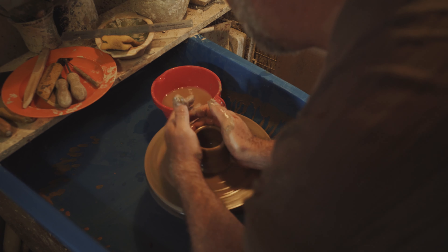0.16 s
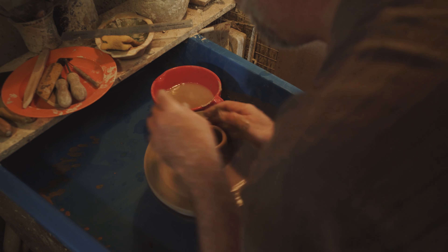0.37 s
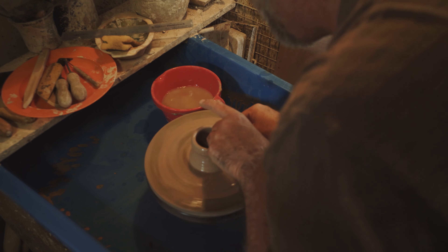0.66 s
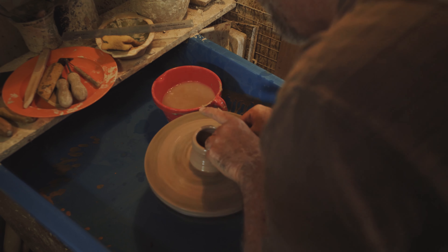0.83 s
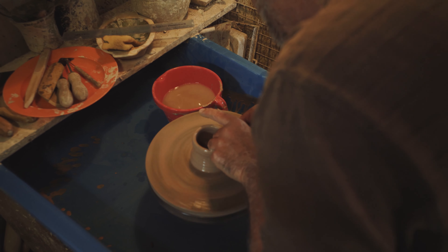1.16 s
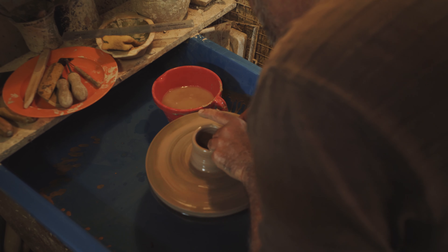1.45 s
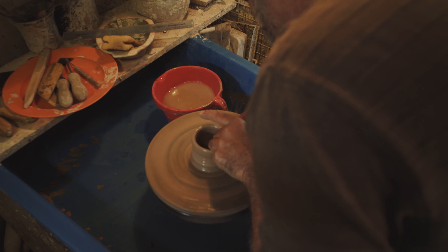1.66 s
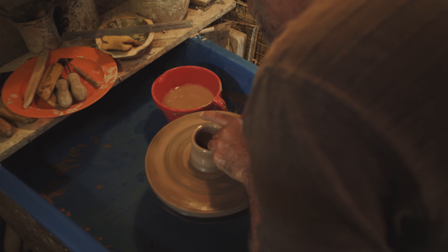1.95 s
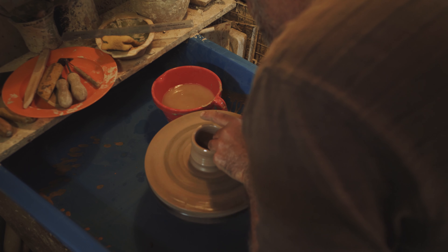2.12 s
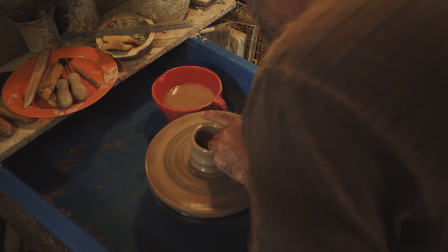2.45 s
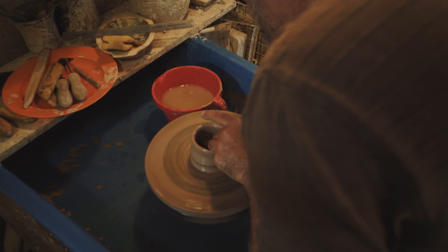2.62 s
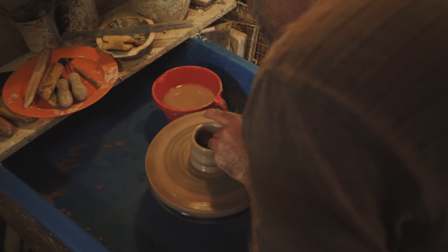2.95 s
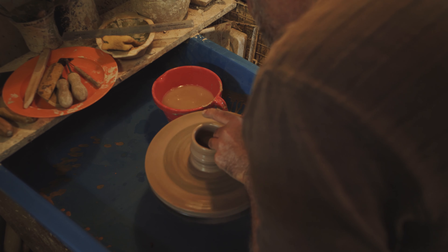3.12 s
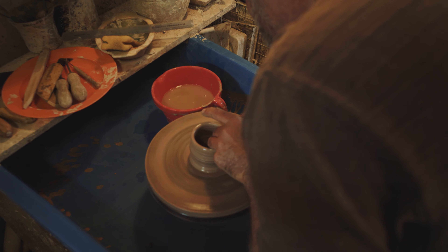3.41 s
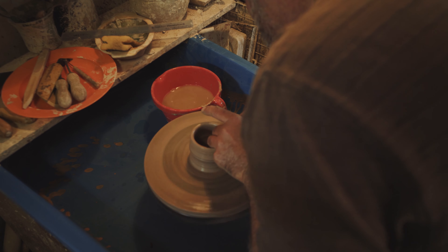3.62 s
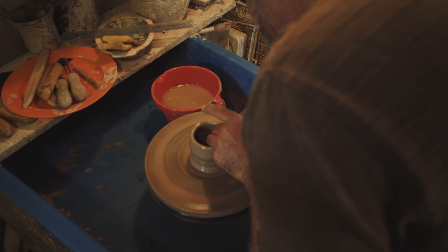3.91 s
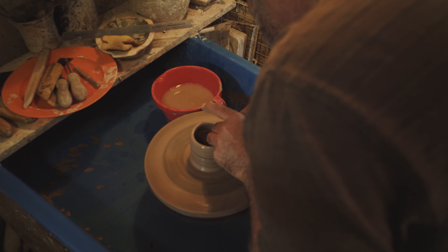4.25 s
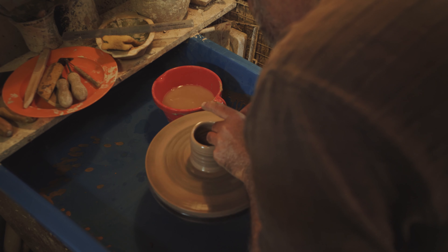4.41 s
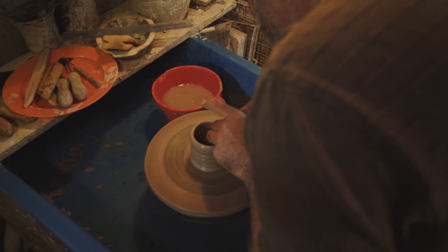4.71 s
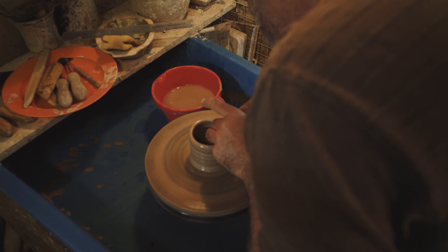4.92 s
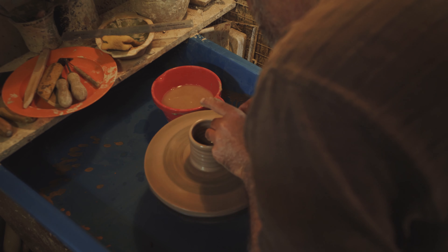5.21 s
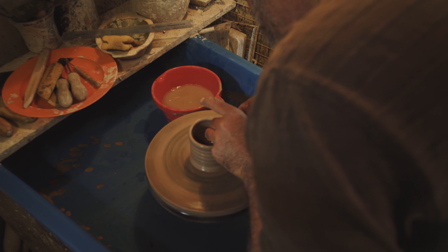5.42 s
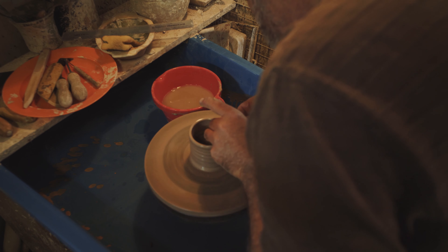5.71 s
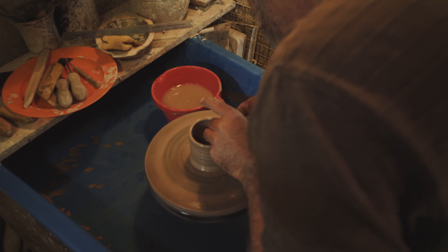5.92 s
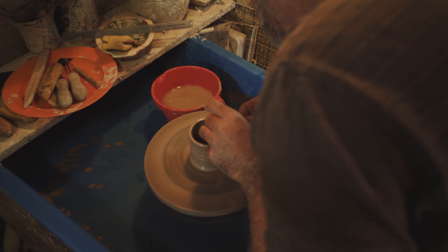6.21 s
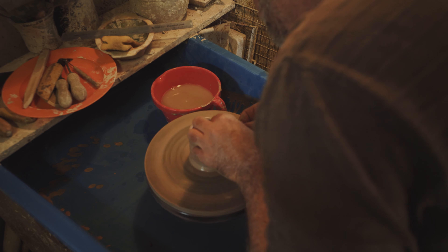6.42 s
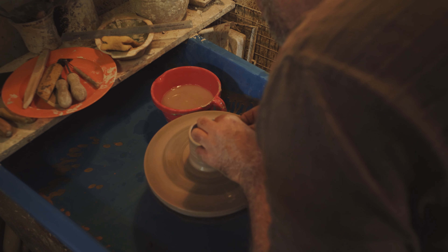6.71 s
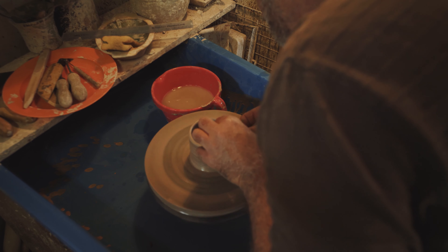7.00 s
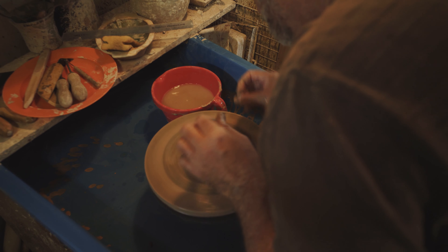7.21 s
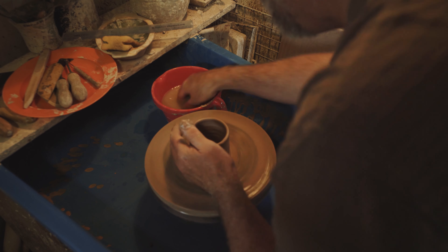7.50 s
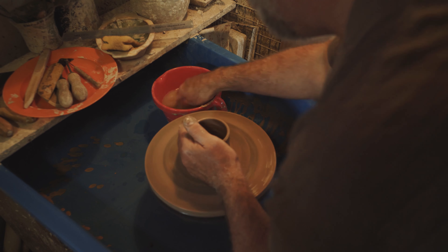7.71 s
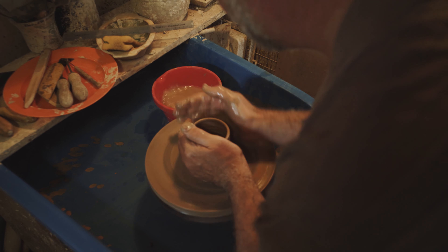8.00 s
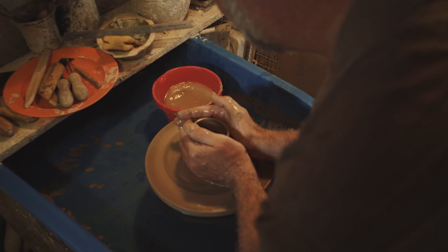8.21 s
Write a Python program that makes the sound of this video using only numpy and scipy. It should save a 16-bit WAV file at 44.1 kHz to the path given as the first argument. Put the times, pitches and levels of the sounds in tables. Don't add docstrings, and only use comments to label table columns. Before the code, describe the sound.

An electric pottery wheel hums and rumbles close by while wet hands brush clay, then a hand dips into a cup with a sharp splash and drips.

```python
import sys
import numpy as np
from scipy import signal
from scipy.fft import rfft, irfft, next_fast_len
from scipy.io import wavfile
from scipy.ndimage import uniform_filter1d, map_coordinates

SR = 44100
rng = np.random.default_rng(int(sys.argv[2]) if len(sys.argv) > 2 else 0)


def attenuation_scalar(level_db):
    decades = np.asarray(level_db, float) / 20
    return 10 ** decades


def to_wav(sig):
    pcm = np.clip(np.atleast_2d(sig), -1, 1) * 32767
    pcm = np.round(pcm).astype(np.int16)
    wavfile.write(sys.argv[1], SR, pcm.T)


N = 368676
RIPPLE_HZ = 99.84

# frequency in Hz, T60 in seconds.
ROOM_DECAY = [(200, 0.37), (2000, 0.13), (10000, 0.16)]
# centre in seconds, half length in seconds, level in dB.
DRONE_SWELLS = [
    (.2, 0.31, -28),
    (1.8, .75, -23.5),
]
# centre in Hz, width in Hz, level in dB.
CASING_RESONANCES = [(31.3, 6.4, -4.5), (66.3, 6, 4.5), (106, 15, -1.5), (157, 6.8, -4), (168.6, 27, -3),
                     (203.14, 4.1, 4), (260.6, 62, -2), (307.4, 12, -4.5), (345.3, 65, -0.5),
                     (416.5, 60, -4), (476.8, 45.6, -6.5), (602, 72, -21), (751.4, 52, -20.5),
                     (877, 46, -24.5), (1580, 120, -25), (1455, 200, -22), (1650, 190, -26.5),
                     (1850, 350, -29), (1900, 19, -27), (2308, 80, -27), (3087, 130, -32.5),
                     (3430, 140, -31), (3700, 200, -41), (4320, 52, -54), (5000, 270, -50),
                     (6000, 1000, -55), (7100, 490, -57)]
# frequency in Hz, level in dB per Hz.
CASING_BED = [(8, -63), (20, -6), (85, -1), (135, -10.5), (222, -21), (320, -6), (500, -6.5), (680, -25.5),
              (1150, -27.5), (2600, -30.5), (3700, -36.5), (4700, -54.5), (7500, -60), (15800, -63.5)]
# time in seconds, pressure as a level in dB.
HAND_PRESSURE = [(0, -55.5), (.74, -54), (1.2, -54.5), (1.5, -49), (1.95, -49.5), (2.3, -52), (2.9, -58),
                 (3.6, -64), (7.2, -63.5), (7.75, -57), (8.06, -60.5), (8.36, -53.5)]
# frequency in Hz, level in dB per Hz.
RUB_COLOUR = [(1500, -120), (2500, 1), (4200, -4), (5500, -13.5), (8000, -19.5), (11000, -24), (15500, -31)]
# frequency in Hz, level in dB per Hz.
SCUFF_COLOUR = [(450, -120), (650, -11.5), (1050, -2), (1500, -15), (1900, -16.5), (3500, -17),
                (4200, -19.5), (6000, -38.5), (9000, -120)]
# centre in seconds, half length in seconds, level in dB.
SLEEVE_STROKES = [
    (1.4, 0.19, -41),
    (1.88, 0.067, -33),
    (1.99, 0.022, -31.5),
    (2.06, 0.05, -36.5),
]
# centre in seconds, half length
# in seconds, rms level in dB, resonance centre in Hz, resonance width in Hz.
SWISHES = [(0.759, .15, -62, 11240, 2460), (1.48, 0.066, -58, 9570, 3980),
           (1.647, .06, -56.5, 7000, 2510), (1.87, 0.057, -43, 4200, 300),
           (2.028, 0.094, -46, 4200, 700), (1.864, 0.054, -54.5, 9000, 9000),
           (2.044, .05, -57, 8970, 9000), (2.249, 0.034, -61.5, 7970, 9000),
           (7.395, .1, -60.5, 7040, 8000), (1.87, 0.063, -33, 1510, 400.5),
           (1.93, .08, -30.5, 1100, 500), (2.044, 0.042, -34, 775, 250),
           (7.679, 0.028, -32, 834, 500), (7.821, 0.033, -33.5, 1500, 1500),
           (7.831, 0.039, -44, 4480, 1800), (7.949, .05, -44, 3500, 2490),
           (8.252, 0.023, -45, 3000, 5000)]
# start in seconds, peak in dB, centre in Hz.
SURFACE_POPS = [
    (7.6594, -8, 2590),
    (7.9012, -34.5, 3500),
]
# start in seconds, peak in dB, centre in Hz.
FILM_CRACKS = [
    (7.6212, -37.5, 8900),
    (7.6426, -38.5, 5770),
    (7.684, -19, 2580),
    (7.8262, -25, 3500),
    (7.9123, -36.5, 8620),
    (7.956, -31.5, 7920),
    (8.2323, -35.5, 6000),
    (2.245, -40, 5500),
]
# start in seconds, peak in dB, centre in Hz.
WET_TICKS = [(.402, -33, 4500), (.57, -48.5, 8000), (1.09, -46.5, 10000), (2.92, -50, 11200),
             (3.369, -48, 9100), (3.73, -42.5, 5500), (4.046, -52.5, 11100), (4.40, -44, 5530),
             (5.75, -42.5, 6000), (7.0467, -39, 4100), (7.626, -40.5, 14000), (7.992, -41.5, 12000),
             (8.041, -43, 12820)]
# start in seconds, peak in dB, centre in Hz.
RINGING_DROPS = [(7.6592, -27.5, 9160), (7.775, -46.5, 9950), (7.794, -26.5, 2660), (7.819, -38, 3900),
                 (7.827, -17, 3620), (7.838, -32, 4930), (7.872, -37.5, 5000), (7.8765, -46.5, 12900),
                 (7.892, -45.5, 8500), (7.939, -27.5, 3370), (7.943, -38, 9870), (7.9546, -27, 3690),
                 (7.99, -35.5, 6360), (8.009, -45, 8600), (8.0279, -38, 5900), (8.0484, -44, 10560),
                 (8.1029, -40.5, 13140), (1.295, -22.5, 2990), (1.47, -45, 9900), (1.665, -47, 7220)]
# start in seconds, peak in dB, centre in Hz.
SPLASH_FIZZ = [
    (7.658, -25.5, 2500),
    (7.6848, -39.5, 9570),
    (7.802, -36.5, 4760),
    (8.099, -44.5, 6000),
    (8.244, -43.5, 10800),
    (8.249, -27, 2640),
]
# start in seconds, peak in dB, pitch in Hz, pitch change as a share, T60 in seconds.
BUBBLE_TONES = [
    (7.6577, -9, 833, .25, 0.023),
    (7.688, -21.5, 1900, -0.18, .02),
    (7.80, -27, 1570, -0.25, 0.021),
    (7.803, -24, 1060, 0.099, 0.06),
    (7.817, -21, 1737, -0.013, .025),
    (7.827, -14.5, 1195, -0.5, 0.0295),
    (7.889, -25, 1250, 0.41, 0.076),
    (0.95, -15, 100, .02, 0.38),
    (7.70, -12.5, 100.6, -0.064, 0.39),
]
# start in seconds, end in seconds, peak in dB, lowest Hz, highest Hz.
DROPLET_SHOWERS = [
    (7.657, 7.697, -32, 700, 4026),
    (7.788, 7.857, -26, 900, 5500),
    (7.881, 7.978, -32, 1500, 6000),
    (8.224, 8.272, -37, 1500, 3860),
]
# time in seconds, shaft speed in Hz, load in dB.
MOTOR_RUN = [(0, 60, 0.5), (.5, 59.4, -3.5), (.82, 58.39, -6.5), (1.1, 57.4, -2.5), (1.45, 56.55, -1),
             (2.35, 56.25, 0), (2.6, 50.32, -0.5), (3.3, 48.87, -1.5), (3.6, 48, -2.5), (3.85, 45.8, -3.5),
             (5, 45.54, -2), (6.4, 46.28, -3.5), (6.9, 47.9, -2), (7.6, 48.1, -2.5), (7.95, 57.63, -4.5),
             (8.36, 56.8, -3.5)]
HARMONIC_DB = [-32.5, -20.5, -22.5, -46, -38, -65, -58.5, -54.5, -61, -57, -63.5, -69.5, -43, -43.5, -40.5,
               -38.5, -49.5, -54, -46, -65.5, -54.5, -53.5, -62.5, -64.5, -67]
SIDEBAND_ORDERS = [(1, 1), (2, -2), (2, -1), (2, 1), (2, 2), (4, 2), (2, 6), (1, -1), (12, 1), (13, 1),
                   (13, 2), (15, 1), (16, -1), (16, 1), (17, -1), (17, 1), (19, -1), (22, 1), (23, 1)]
SIDEBAND_DB = [-34.5, -34, -38, -25, -24, -41.5, -29.5, -37, -66, -52, -57.5, -52.5, -55, -51.5, -50, -65,
               -62, -55.5, -54]


def unit(x):
    return x / np.sqrt(np.mean(x ** 2) + 1e-20)


def along(points, hz):
    f, v = np.transpose(points)
    return np.interp(np.log(hz + 1), np.log(f + 1), v)


def curves(rows):
    s, *cols = np.transpose(rows)
    return [np.interp(np.arange(N) / SR, s, c) for c in cols]


def swells(rows):
    t = np.arange(N) / SR
    return sum(attenuation_scalar(db) * np.exp(-((t - s) / half) ** 2) for s, half, db in rows)


def wobble(rate):
    coarse = np.arange(0, N + 64, 64)
    knots = rng.standard_normal(N // 500)
    return np.interp(np.arange(N), coarse, map_coordinates(knots, [coarse * rate / SR]))


def filtered(x, response):
    m = next_fast_len(N + SR // 2)
    return irfft(rfft(x, m) * response(np.fft.rfftfreq(m, 1 / SR)), m)[:N]


def band(hz, width_hz, size):
    f = np.fft.rfftfreq(size, 1 / SR)
    low_cut = f / np.hypot(f, .5 * hz)
    resonance = 1 / (1 + (2 * (f - hz) / width_hz) ** 2) ** 1.1
    return unit(irfft(rfft(rng.standard_normal(size)) * low_cut * resonance, size))


def patchy(depth_db):
    z = signal.stft(rng.standard_normal(N), nperseg=2048)[2]
    field = uniform_filter1d(rng.standard_normal(z.shape), size=5, axis=0)
    field = uniform_filter1d(field, size=5, axis=1)
    return signal.istft(z * attenuation_scalar(depth_db * unit(field)), nperseg=2048)[1][:N]


def grains(per_second, spread_db, hiss):
    hit = rng.random(N) < per_second / SR
    size = attenuation_scalar(spread_db * np.minimum(rng.exponential(size=N), 3))
    return unit(hit * rng.standard_normal(N) * size) + hiss * rng.standard_normal(N)


def studio(x):
    hz, t, z = signal.stft(rng.standard_normal(SR // 2), SR, nperseg=256)
    decay = attenuation_scalar(-60 * t / along(ROOM_DECAY, hz)[:, None])
    tail = signal.istft(z * decay, SR, nperseg=256)[1]
    return signal.fftconvolve(x, tail / np.linalg.norm(tail))[:N]


def floor_drone():
    phase = 2 * np.pi * 40 * np.arange(N) / SR + 0.41 * wobble(1.6)
    return swells(DRONE_SWELLS) * np.sqrt(2) * attenuation_scalar(1.9 * wobble(3.5)) * np.sin(phase)


def casing_colour(f):
    peaks = sum(attenuation_scalar(2 * db) / (1 + (2 * (f - c) / w) ** 2) ** 2 for c, w, db in CASING_RESONANCES)
    return np.sqrt(peaks + attenuation_scalar(2 * (along(CASING_BED, f) - 4.0))) * (f > 12)


def casing():
    t = np.arange(N) / SR
    split_hz = 560
    load_db = curves(MOTOR_RUN)[1]
    rumble_db = -20.5 + 0.25 * load_db + 1.44 * wobble(8)
    treble_db = -22.5 + 0.37 * wobble(12)
    low = filtered(patchy(depth_db=1), lambda f: casing_colour(f) * (f < split_hz))
    gated = patchy(depth_db=1.05) * (1 + 0.12 * np.cos(2 * np.pi * RIPPLE_HZ * t))
    high = filtered(gated, lambda f: casing_colour(f) * (f >= split_hz))
    throb = attenuation_scalar(0.14 * np.sin(2 * np.pi * 3.6 * t))
    scale = attenuation_scalar(3.5) / np.std(low)
    return scale * throb * (attenuation_scalar(rumble_db) * low + attenuation_scalar(treble_db) * high)


def hands():
    pressure_db, = curves(HAND_PRESSURE)
    rub = unit(filtered(grains(2000, spread_db=3, hiss=4.9), lambda f: attenuation_scalar(along(RUB_COLOUR, f))))
    return attenuation_scalar(pressure_db + 7.0 + 1.1 * wobble(9.7) + 1.0 * wobble(29)) * rub


def sleeve():
    scuff = unit(filtered(grains(400, spread_db=0.0, hiss=2.1), lambda f: attenuation_scalar(along(SCUFF_COLOUR, f))))
    return (attenuation_scalar(-51) + swells(SLEEVE_STROKES)) * attenuation_scalar(2.5 * wobble(32)) * scuff


def swishes():
    out = np.zeros(N + SR)
    u = np.arange(-SR // 2, SR // 2) / SR
    for s, half, db, hz, width_hz in SWISHES:
        out[round(s * SR):][:SR] += attenuation_scalar(db) * np.exp(-(u / half) ** 2) * band(hz, width_hz, size=SR)
    return out[SR // 2:][:N] * attenuation_scalar(2.2 * wobble(90))


def showers():
    out = np.zeros(N + SR)
    t = np.arange(1024) / SR
    for start, end, db, low_hz, high_hz in DROPLET_SHOWERS:
        for when, pitch, size in rng.random((32, 3)):
            hz = low_hz * (high_hz / low_hz) ** pitch
            envelope = np.exp(-t * hz / 4) * (1 - np.exp(-t * hz))
            drop = np.sin(2 * np.pi * hz * t * (1 + 0.007 * hz * t)) * envelope
            out[round((start + when * (end - start)) * SR):][:len(t)] += attenuation_scalar(db - 13 * size) * drop
    return out[:N]


def snaps():
    out = np.zeros(N + SR)
    t = np.arange(4096) / SR
    # events, width over centre, T60 in seconds
    kinds = [(SURFACE_POPS, 5.7, 0.0062), (FILM_CRACKS, 1.6, 0.011), (WET_TICKS, .4, 0.019),
             (RINGING_DROPS, .2, 0.046), (SPLASH_FIZZ, 0.98, 0.041)]
    for rows, wide, t60 in kinds:
        for s, db, hz in rows:
            attack = 1 - np.exp(-3 * wide * hz * t)
            burst = attack * band(hz, wide * hz, size=4096)
            out[round(s * SR):][:len(t)] += attenuation_scalar(db - 3.5 - 60 * t / t60) * burst
    return out[:N]


def bubbles():
    out = np.zeros(N + SR)
    t = np.arange(SR // 2) / SR
    for s, db, hz, glide, t60 in BUBBLE_TONES:
        phase = 2 * np.pi * hz * (t + glide * t * t / t60)
        attack = 1 - np.exp(-t * hz / 0.63)
        out[round(s * SR):][:len(t)] += attenuation_scalar(db + 4.0 - 60 * t / t60) * attack * np.sin(phase)
    return out[:N]


def motor():
    shaft_hz, load_db = curves(MOTOR_RUN)
    hum_db = load_db + 2.0 + 0.52 * wobble(7)
    ripple = 2 * np.pi * RIPPLE_HZ * np.arange(N) / SR
    shaft = 2 * np.pi * np.cumsum(shaft_hz + .5 * wobble(4)) / SR
    slowing_hz = 60 - shaft_hz - 12
    orders = [(k + 1, 0) for k in range(len(HARMONIC_DB))] + list(SIDEBAND_ORDERS)
    levels = list(HARMONIC_DB) + list(SIDEBAND_DB)
    tones = np.zeros(N)
    for (k, m), db in zip(orders, levels):
        buzz = k > 10
        hum = (k, m) == (2, 0)
        drive_db = load_db if buzz else hum_db if hum else 0
        sway_db = (1 if buzz else 2.2 if m or k == 3 else .9) * wobble(5.5)
        detuned_db = -1.1 * max(abs(m) - 1, 0) * np.abs(shaft_hz - 46)
        drag_db = 0.18 * slowing_hz * (12 < k < 18 or (k, m) == (2, 1)) - 0.15 * slowing_hz * (k == 19)
        late = .25 * (k - 15) ** 2 if buzz else np.pi / 2 * hum
        gain = np.sqrt(2) * attenuation_scalar(db + drive_db + sway_db + detuned_db + drag_db)
        tones += gain * np.cos(k * (ripple - 1.5) + m * shaft - late)
    return tones


def scene():
    water = snaps() + bubbles() + showers()
    room = attenuation_scalar(-10.0) * studio(water)
    wheel = motor() + casing() + floor_drone()
    return (wheel + hands() + sleeve() + swishes() + water + room)[None]


def top_cut(x):
    return signal.sosfilt(signal.butter(12, 15790, fs=SR, output="sos"), x)


def record(dry):
    whistle_hz = 15734
    whistle = attenuation_scalar(-78) * np.sin(2 * np.pi * whistle_hz * np.arange(N) / SR)
    kept = filtered(dry[0], lambda f: f < whistle_hz) + whistle
    held = kept / (1 + np.abs(kept / .8) ** 6) ** (1 / 6)
    return top_cut(held[None])


dry = scene()
out = record(dry)
to_wav(out)
```